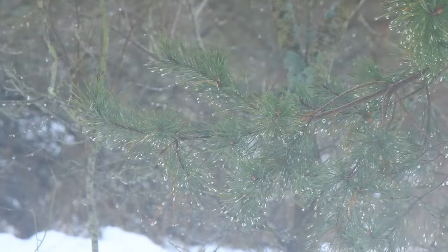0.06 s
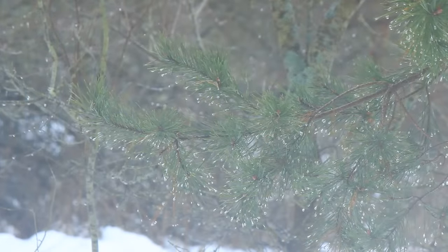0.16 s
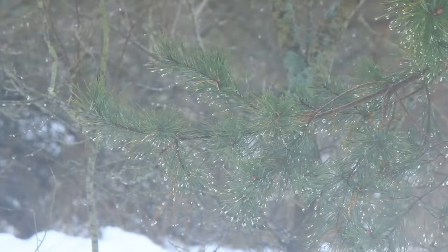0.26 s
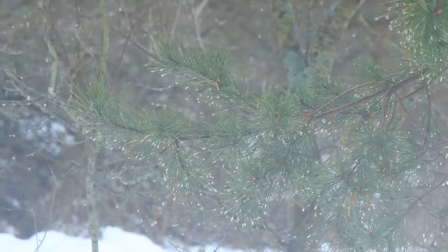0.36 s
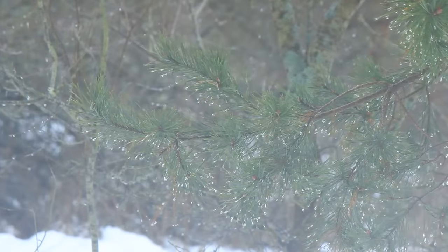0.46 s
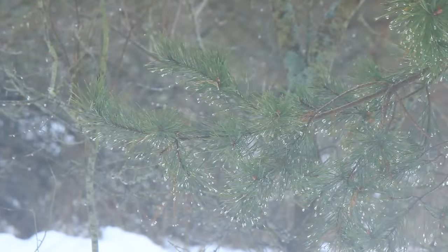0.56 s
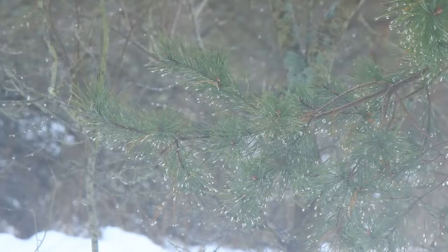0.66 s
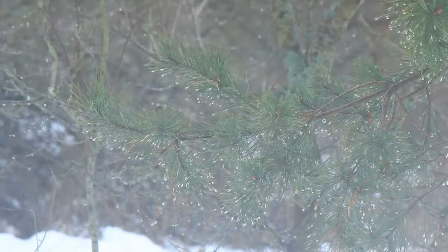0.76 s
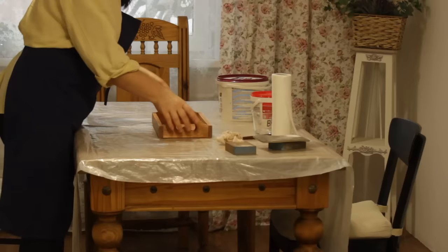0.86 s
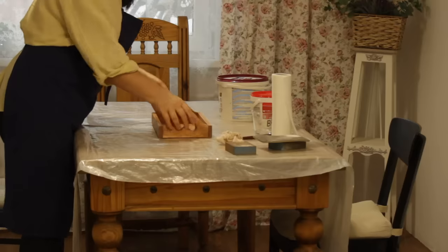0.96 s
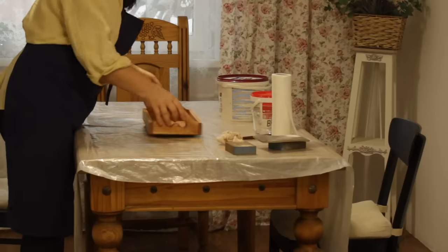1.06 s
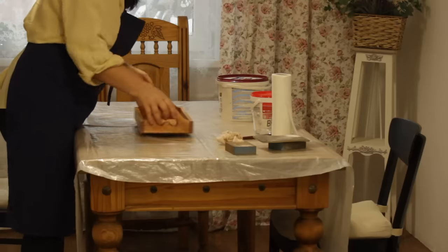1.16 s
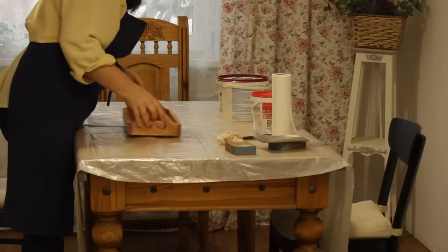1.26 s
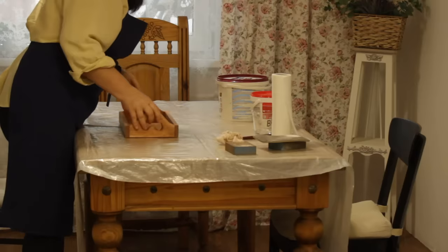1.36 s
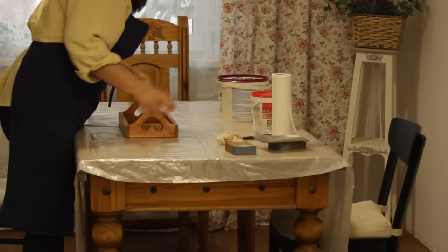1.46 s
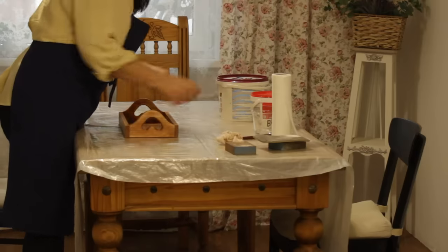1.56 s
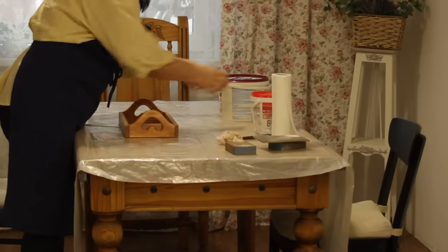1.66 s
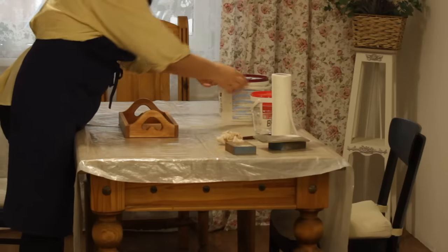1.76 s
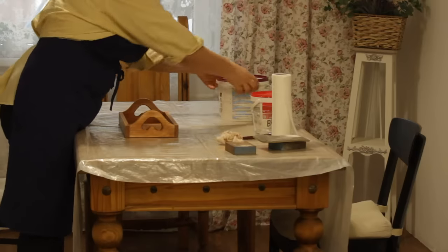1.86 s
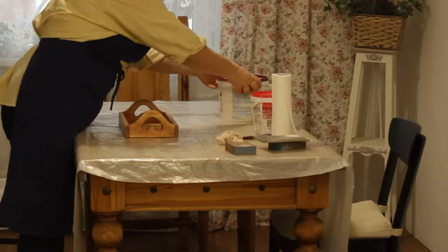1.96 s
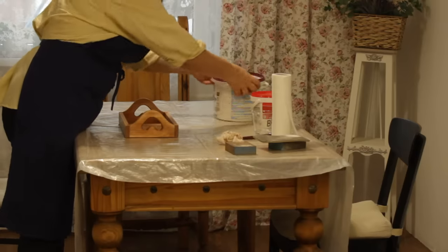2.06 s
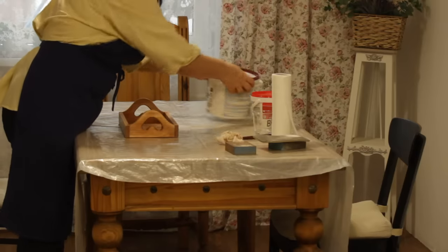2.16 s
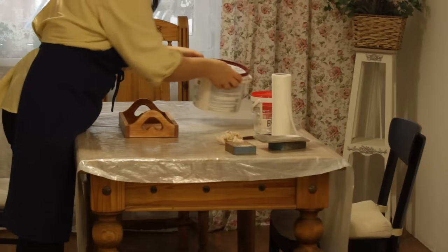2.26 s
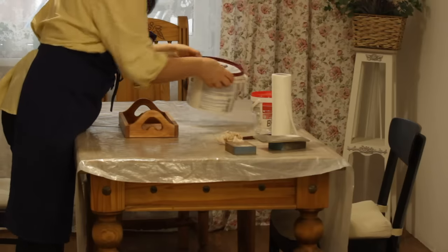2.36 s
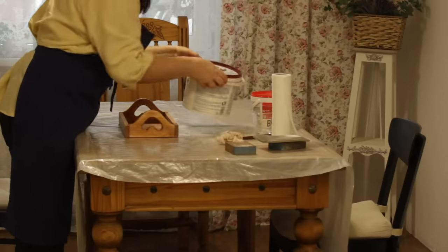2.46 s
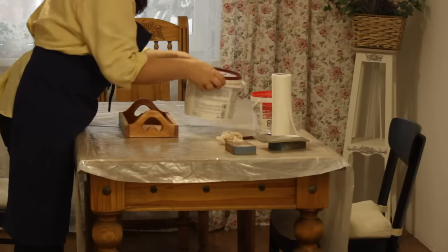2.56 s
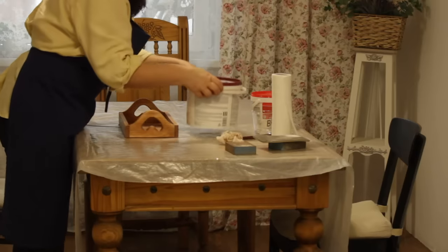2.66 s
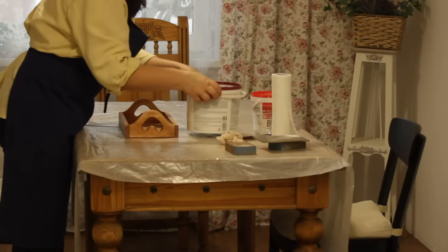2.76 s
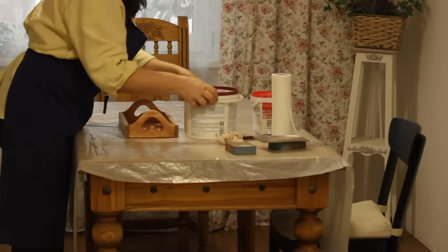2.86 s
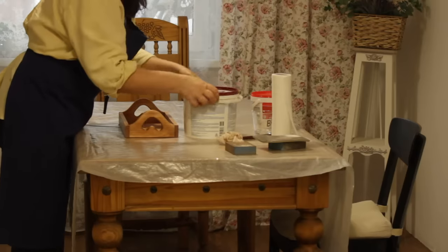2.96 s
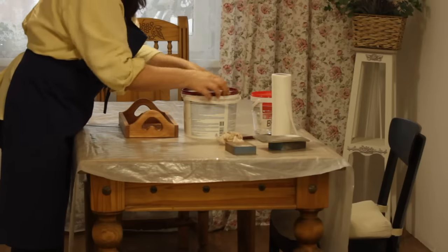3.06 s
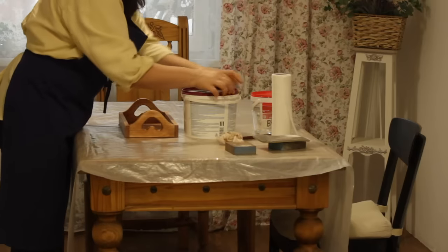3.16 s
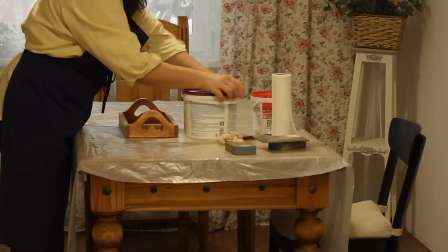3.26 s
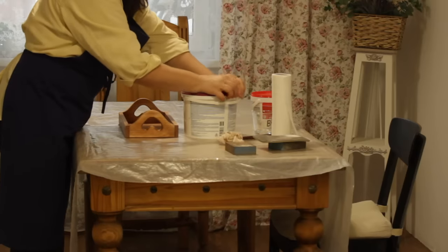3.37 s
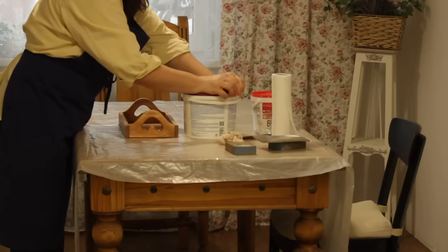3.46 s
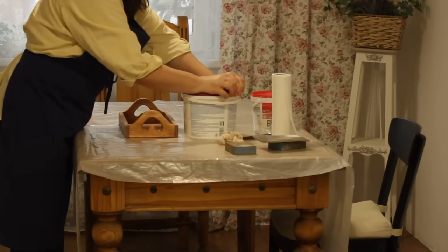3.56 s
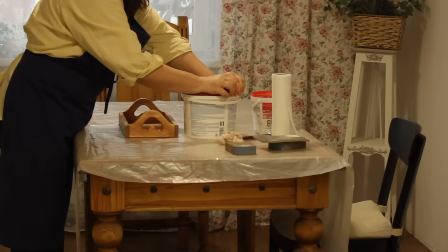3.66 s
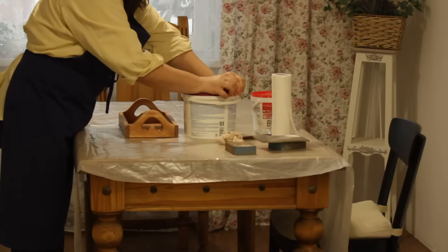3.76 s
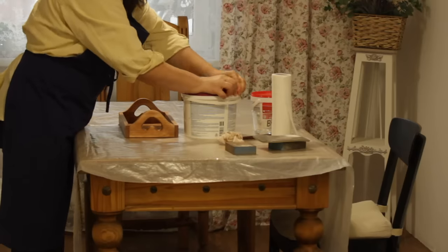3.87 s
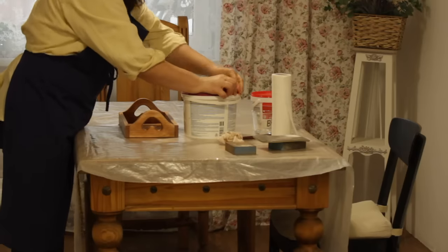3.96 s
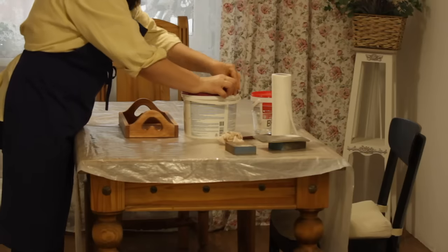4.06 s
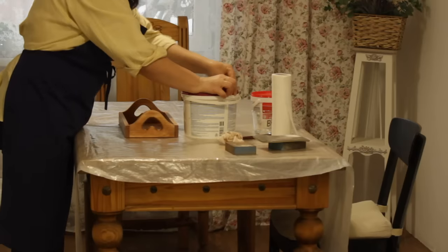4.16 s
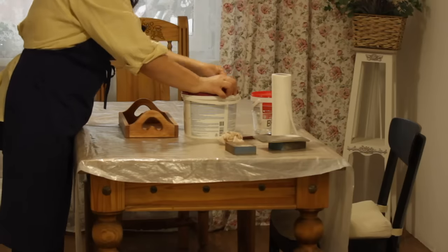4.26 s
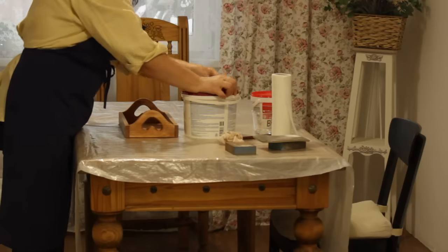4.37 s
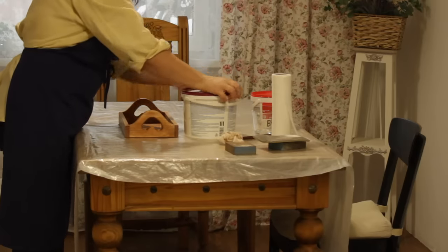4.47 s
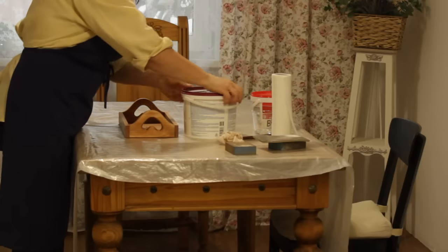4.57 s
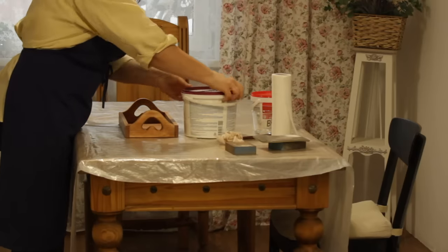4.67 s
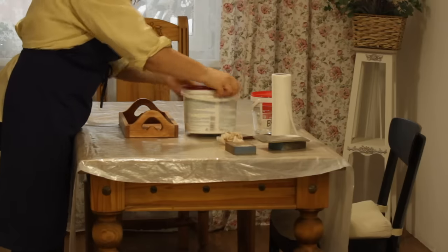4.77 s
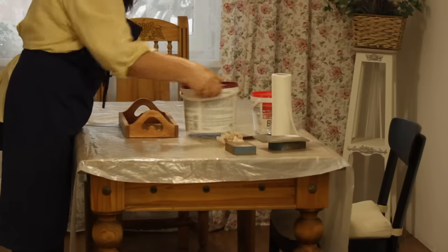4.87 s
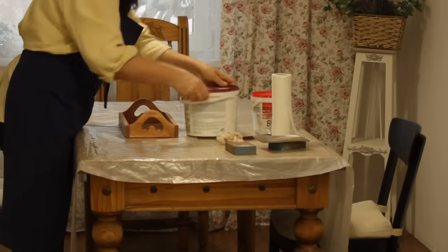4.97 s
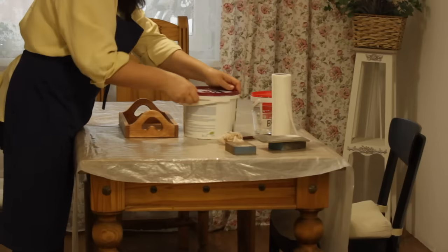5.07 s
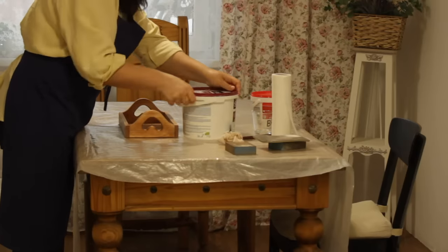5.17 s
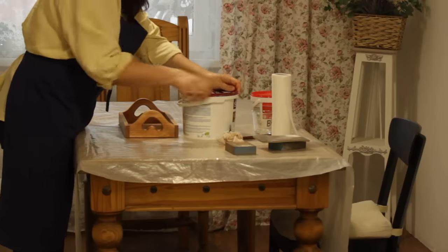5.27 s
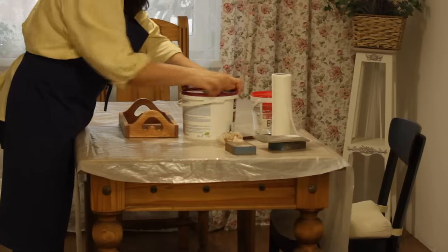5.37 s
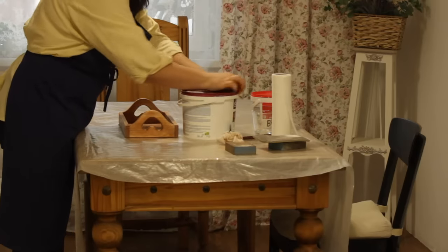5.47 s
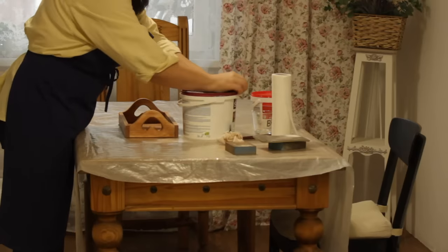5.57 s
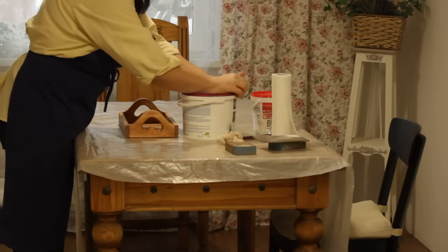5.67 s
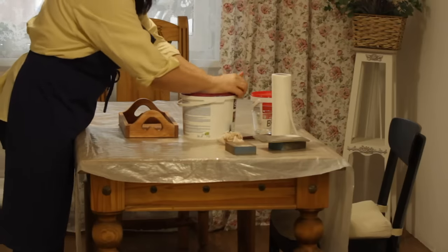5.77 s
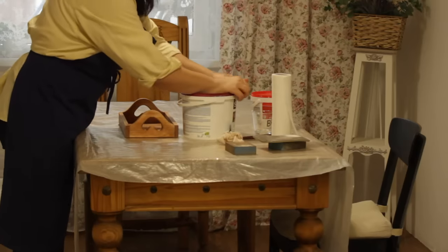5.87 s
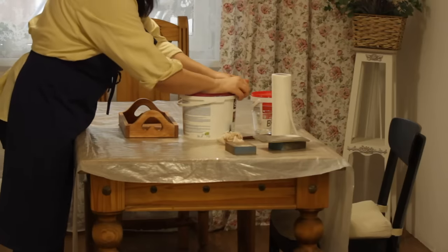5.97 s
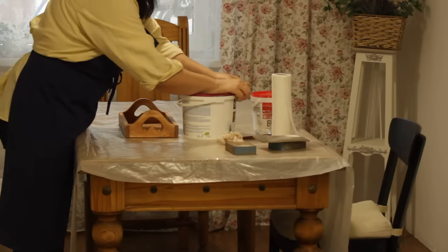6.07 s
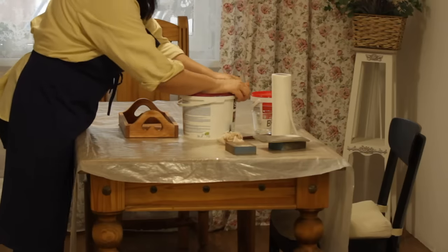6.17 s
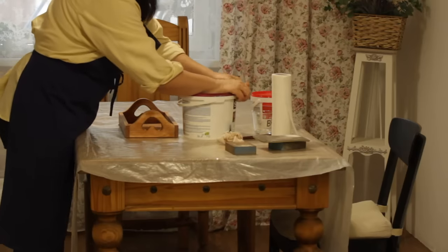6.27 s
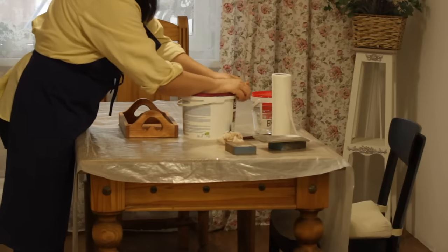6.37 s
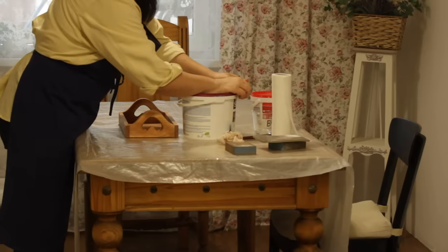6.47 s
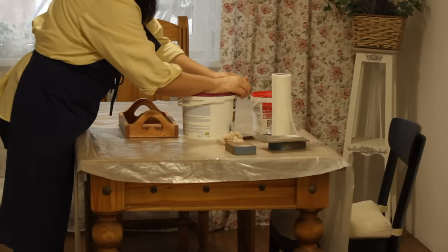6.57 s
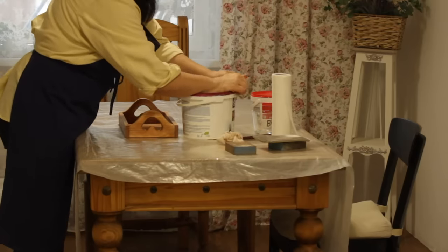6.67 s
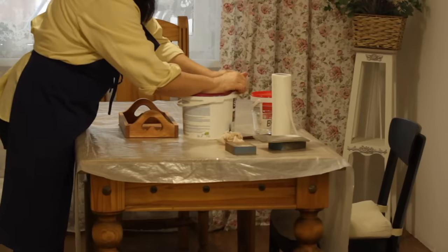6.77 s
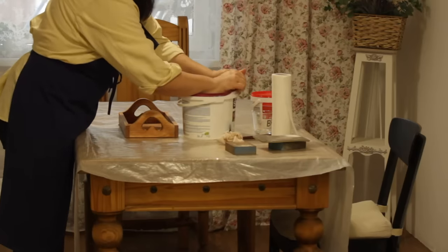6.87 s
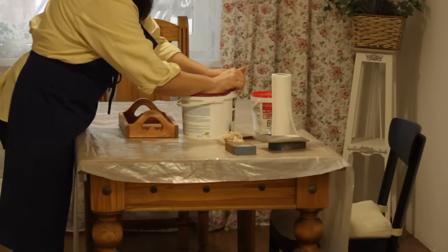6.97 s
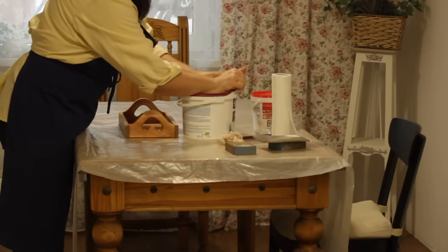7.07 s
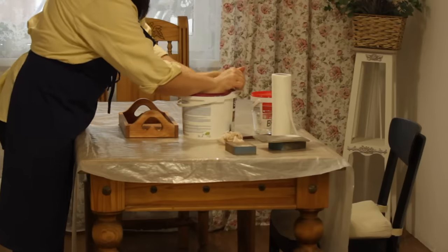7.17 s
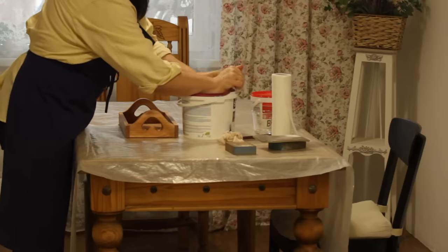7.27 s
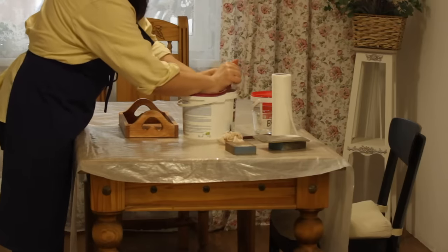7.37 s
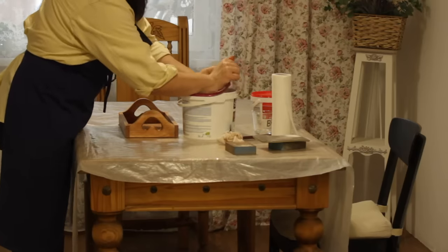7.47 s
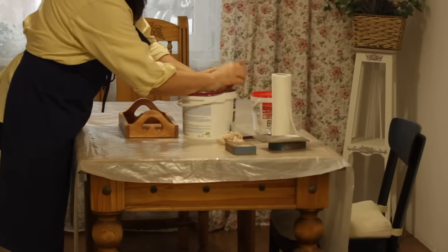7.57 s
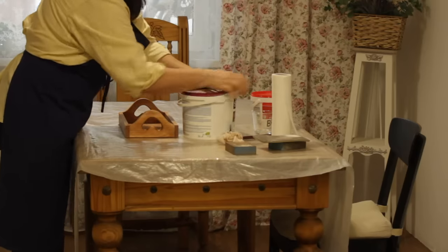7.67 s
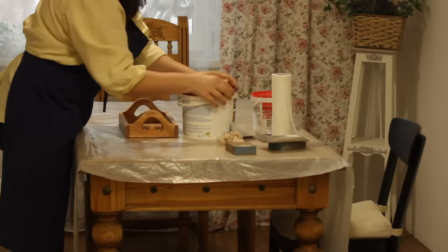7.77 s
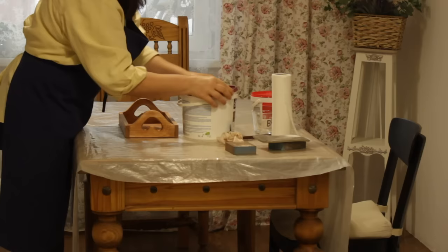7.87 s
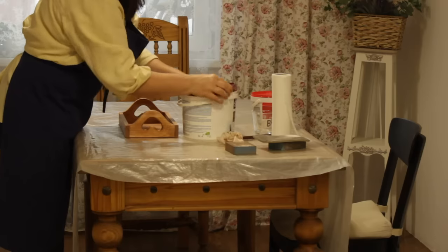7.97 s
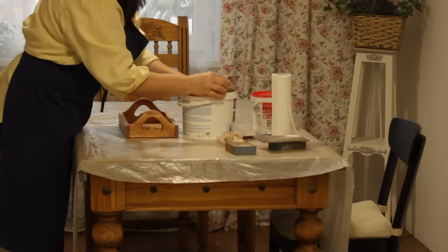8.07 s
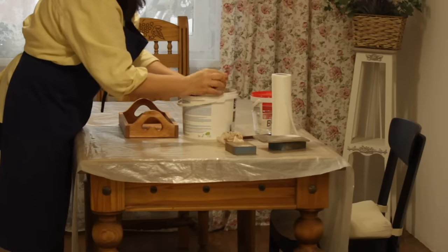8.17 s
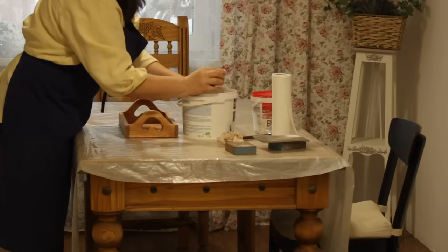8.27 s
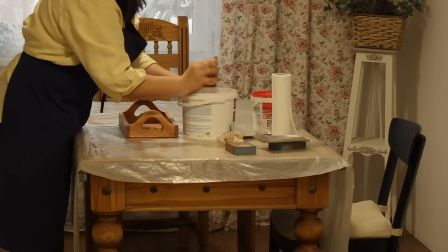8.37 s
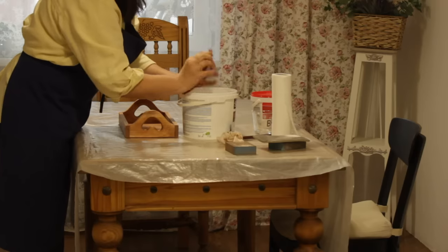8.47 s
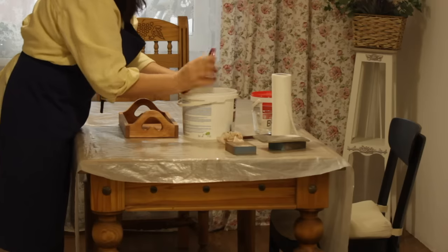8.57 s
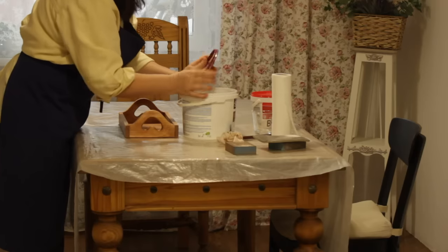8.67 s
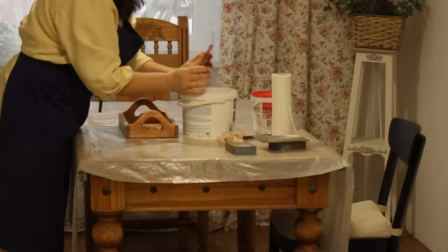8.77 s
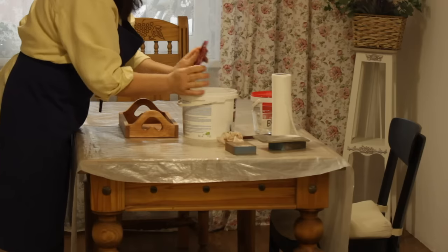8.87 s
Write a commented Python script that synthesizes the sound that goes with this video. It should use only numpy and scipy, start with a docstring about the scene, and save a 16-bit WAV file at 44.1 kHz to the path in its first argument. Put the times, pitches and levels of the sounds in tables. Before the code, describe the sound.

A moment of outdoor drizzle and distant rumble gives way abruptly to a slightly echoing room with soft ventilation and a thin electronic whine, heard in mono. A wooden tray is put down, then a plastic tub lands on the table and is shifted. Fingernails tick on it while the lid cracks and snaps free of the rim bit by bit, gives one loud hollow pop, and scrapes off with a few more pops.

```python
"""A plastic tub is put on a dining table, turned, and its lid pried off with pops, cracks and scrapes.
Each knock makes parts of the tub and table ring, and the room echoes it. Before that a wooden tray is
set down. Ventilation drones and a camera whines faintly. The first second is outdoors, in fine rain
with a far rumble (stereo); then the sound cuts to the dining room (mono)."""
import sys
import numpy as np
from scipy import signal
from scipy.fft import rfft, irfft, next_fast_len
from scipy.io import wavfile
from scipy.ndimage import map_coordinates

SR = 44100
rng = np.random.default_rng(int(sys.argv[2]) if len(sys.argv) > 2 else 0)


def store_wav(level_fs):
    """Save 16-bit WAV to argv[1]."""
    pcm = np.round(np.clip(np.atleast_2d(level_fs), -1, 1) * 32767)
    wavfile.write(sys.argv[1], SR, pcm.T.astype(np.int16))


N = 393372
TIME = np.arange(N) / SR
KNOCK_SAMPLES = 2 ** 15  # length of one knock with its echo
KNOCK_HZ = np.fft.rfftfreq(KNOCK_SAMPLES, 1 / SR)

# how the tub's base, hollow and thin edge ring: (pitch [Hz], width [Hz], level [dB])
TUB_BASE = [(357.5, 90, 0), (394, 85, -5.5), (462, 56, 1)]
TUB_HOLLOW = [(515.5, 64, 4.2), (615.5, 47, -0.9), (726, 127, 1.5)]
TUB_EDGE = [(7500, 5000, 0), (13000, 9000, -9)]


def tub_parts():
    """The six stiff parts, low to high. They ring at the same pitches whatever hits them."""
    # how the table, tub wall and rim ring: (pitch [Hz], width [Hz], level [dB])
    table = [(70, 28, -13), (181, 23, -12.5), (278.5, 90, 11.5)]
    wall = [(890, 115, 6.5), (1074, 126, -8), (1202, 105, 4), (1445, 284, -3.5)]
    rim = [(1750, 380, 9.6), (2120, 380, 6.4), (2930, 1550, 1.8)]
    return [ringing(part) for part in (table, TUB_BASE, TUB_HOLLOW, wall, rim, TUB_EDGE)]


def part_levels(db, hardness):
    """A level for each stiff part: a harder knock favours the high ones."""
    # middle of table, base, hollow, wall, rim and edge: (pitch [Hz])
    middles = [270, 410, 610, 1100, 2000, 8000]
    return db + hardness * np.log2(np.divide(middles, middles[2]))


def tub_landings():
    """The tub lands: its parts, lid and lip ring, and the whole table top thuds."""
    # (time [s], tub [dB], hardness [dB/octave], thud [dB], lid [dB], lid pitch [Hz], lip [dB])
    landings = [(2.935, -22.5, 1.3, -37.5, -24.5, 723, -48), (2.973, -34, 0.3, -47, -26.5, 645, -59),
                (5.069, -25.5, -2.5, -44, -27.5, 377, -65), (5.205, -42.5, -5.5, -54, -46, 278, -47.5)]
    # the table top's thud: (pitch [Hz], width [Hz], level [dB])
    thud = [(60, 38, -8), (166.3, 52, 1)]
    # boost for each stiff part: (level [dB])
    mix = [-2.5, 0.5, 1, -2.5, -9.5, -38]
    out, parts = np.zeros(N), tub_parts()
    for start, db, hardness, thud_db, lid_db, lid_hz, lip_db in landings:
        levels = [*(part_levels(db, hardness) + mix), thud_db, lid_db, lip_db]
        rings = parts + [ringing(thud), lid_note(lid_hz), lip_note(hz=4540)]
        add_knock(out, start, levels, rings, swell_s=0.0048, echo_db=11)
    return out


def lid_pops():
    """The lid flexes and drums, at a different pitch each time it bends."""
    # (time [s], tub [dB], hardness [dB/octave], lid [dB], lid pitch [Hz], overtone [dB],
    #  overtone pitch [Hz], lip [dB], lip pitch [Hz], echo [dB])
    pops = [ (2.106, -48, 2, -58, 576, -45, 2420, -64, 3300, 3.5),
            (4.693, -50, 5, -41, 445, -57, 1110, -56, 3870, 4),
            (6.484, -46.5, 4, -46.5, 269, -51, 401, -54, 5460, 10),
            (6.776, -48.5, 4.5, -43, 300, -53, 453, -45.5, 4900, 6.5),
            (7.382, -23.5, -0.8, -16.5, 593, -20.5, 1120, -39, 3620, 7.5),
            (7.398, -28, 2.5, -20, 357, -29, 1130, -40, 3630, 6),
            (7.828, -50.5, 3.5, -43, 350, -50, 886, -80, 3110, 3.5),
            (8.080, -55, -1, -47, 630, -62, 1080, -64, 4600, 6),
            (8.132, -39, 2.7, -25.5, 395.5, -64, 912, -48, 4000, 10.5),
            (8.421, -41, -2, -28.5, 501, -33, 1406, -56, 3260, 5),
            (8.538, -34.5, 0, -44, 417, -33, 1990, -38.5, 3900, 9),
            (8.575, -33.5, 0.6, -28, 537, -43, 1126, -46, 3520, 0.5),
            (8.851, -39.5, 2.4, -26, 601, -59, 1740, -43, 5830, 6),
            (8.883, -55, -.6, -31.5, 600, -59, 1130, -47, 3350, 15)]
    # boost for each stiff part: (level [dB])
    mix = [-13, 0, -1.5, 0, -5, -26.5]
    out, parts = np.zeros(N), tub_parts()
    for start, db, hardness, lid_db, lid_hz, over_db, over_hz, lip_db, lip_hz, echo_db in pops:
        levels = [*(part_levels(db, hardness) + mix), lid_db, over_db, lip_db]
        rings = parts + [lid_note(lid_hz), overtone(over_hz), lip_note(lip_hz)]
        swell_s = 0.0052 * amp(0.4 * echo_db)  # a louder echo swells for longer
        add_knock(out, start, levels, rings, swell_s, echo_db)
    return out


def lip_cracks():
    """The lid's lip breaks free with a crack that rings the tub's wall."""
    # (time [s], tub [dB], hardness [dB/octave], wall note [dB], wall pitch [Hz], lip [dB],
    #  lip pitch [Hz], edge [dB], echo [dB])
    cracks = [ (1.872, -52, 0, -55, 654, -58, 3350, -60, 5),
              (1.910, -50, 2, -50, 622, -38.5, 4500, -46.5, 12),
              (4.519, -60.5, 6.5, -75, 1210, -54, 4240, -66, 8),
              (4.728, -33, 1.8, -33.5, 1230, -32, 4300, -60, 7),
              (5.438, -48.5, 0, -48.5, 1180, -48, 4200, -71.5, 3),
              (5.641, -38, -0.1, -38.5, 1216, -28.5, 3970, -61, 3),
              (5.966, -43.5, 0.5, -67, 1230, -41, 5530, -47.5, 5),
              (6.966, -35.5, -1.5, -34.5, 976, -44.5, 3370, -56, 8),
              (7.243, -54.5, 4, -74, 1200, -48, 5200, -69, 7)]
    # boost for each stiff part but the edge: (level [dB])
    mix = [-14.5, -12, -6, -5, 0]
    out, parts = np.zeros(N), tub_parts()
    for start, db, hardness, wall_db, wall_hz, lip_db, lip_hz, edge_db, echo_db in cracks:
        levels = [*(part_levels(db, hardness)[:-1] + mix), edge_db, wall_db, lip_db]
        rings = parts + [overtone(wall_hz), lip_note(lip_hz)]
        add_knock(out, start, levels, rings, swell_s=0.0027, echo_db=echo_db)
    return out


def lip_snaps():
    """The lip slips over the rim with a small, bright snap."""
    # (time [s], lip [dB], lip pitch [Hz], edge [dB], echo [dB])
    snaps = [(5.650, -38, 6500, -49, 1), (5.937, -49, 2400, -63, 8), (5.958, -37, 4960, -52, 9),
             (5.976, -46, 5500, -50, -2), (6.388, -53.5, 5700, -69, 6), (6.788, -49, 5800, -57, -2),
             (6.847, -43.5, 4870, -46.5, -3), (6.856, -49, 6170, -52, 0), (6.968, -46.5, 6030, -65, 4),
             (7.357, -43, 4400, -41.5, -3), (7.366, -38, 6100, -51, 9), (8.48, -41, 5460, -51, 6),
             (8.489, -45, 5100, -60, 4), (8.551, -44, 4100, -60, -1), (8.587, -43.5, 4600, -50, 0)]
    out = np.zeros(N)
    for start, lip_db, lip_hz, edge_db, echo_db in snaps:
        rings = [lip_note(lip_hz), ringing(TUB_EDGE)]
        add_knock(out, start, [lip_db, edge_db], rings, swell_s=0.0015, echo_db=echo_db)
    return out


def lid_note(hz):
    """The lid rings briefly, like a small drum."""
    return ringing([(hz, 0.17 * hz, 0)])


def overtone(hz):
    """A further note of the plastic: the higher it is, the faster it dies."""
    return ringing([(hz, 0.13 * hz * (hz / 1000), 0)])


def lip_note(hz):
    """The bent lip: a broad crack with a slightly narrower ring on top."""
    return ringing([(hz, 0.61 * hz, 0)]) + ringing([(hz, 0.44 * hz, -7)])


def rubbing():
    """Grainy friction drums on the tub and scratches on the table cover."""
    # (start [s], full from [s], full until [s], end [s], drum [dB], scratch [dB])
    strokes = [(.86, 0.923, 1.08, 1.07, -76, -60.5), (1.9, 1.925, 1.99, 2.23, -71, -57),
               (4.17, 4.297, 4.33, 4.3, -80, -66), (4.47, 4.554, 4.63, 4.7, -78, -65),
               (4.62, 4.74, 4.72, 5, -66, -54), (5.101, 5.164, 5.25, 5.52, -50.5, -60),
               (7.9, 7.946, 8.1, 8.17, -68, -63.5), (8.25, 8.41, 9.7, 8.5, -48, -55),
               (8.467, 8.56, 8.13, 8.75, -42, -42)]  # times out of order make the level jump
    # tone of the scratch: (pitch [Hz], level [dB])
    scratch_tone = [(530, -32), (900, -5), (1110, -6), (1760, 1.5), (2080, -6.5), (2790, -4), (3290, -4),
                    (15000, -23.5)]
    fade_db = [-25.5, 0, 0, -25.5]
    fades = amp([np.interp(TIME, row[:4], fade_db, left=-200, right=-200) for row in strokes])
    drum_db, scratch_db = np.transpose(strokes)[4:]
    # slow sticking and slipping, plus a fine grain
    grains = rng.standard_normal(N) * amp(1.6 * wobble(45) + 4 * wobble(500))
    drum = unit(filtered(grains, lambda hz: ringing(TUB_BASE + TUB_HOLLOW, hz)))
    scratch = unit(filtered(grains, lambda hz: amp(along(scratch_tone, hz))))
    rubs = drum * (amp(drum_db) @ fades) + scratch * (amp(scratch_db) @ fades)
    return signal.fftconvolve(rubs, room(echo_db=0, swell_s=0.0014))[:N]


def ticks():
    """Fingernails and the slack rim tick: very short notes with little echo."""
    # (time [s], level [dB], pitch [Hz])
    taps = [(2.396, -49, 3540), (2.6467, -45.5, 2270), (3.19, -46, 3500), (3.3639, -51, 2010),
            (3.6013, -47, 3400), (3.693, -52, 1720), (3.7502, -47, 2320), (4.0477, -47, 3500),
            (4.2652, -49, 3520), (4.3142, -46, 2270), (5.5648, -47, 3530), (5.881, -48, 3500),
            (6.2644, -47, 3560), (6.6646, -48, 3530), (7.632, -42.5, 3880), (7.673, -48, 3480),
            (7.9727, -47, 1630), (8.054, -56, 1670)]
    out, t = np.zeros(N + SR), np.arange(SR // 50) / SR
    for start, db, hz in taps:
        tick = amp(db) * np.sin(2 * np.pi * hz * t) * np.exp(-t * hz / 6.8)
        out[round(start * SR):][:len(t)] += tick
    return signal.fftconvolve(out, room(echo_db=-5, swell_s=0.002))[:N]


def tray():
    """The wooden tray lands on one edge, rocks, then lies flat."""
    # how the wood rings: (pitch [Hz], width [Hz], level [dB])
    wood = [(306, 100, -2.5), (427, 89, 6), (654, 220, -1.5), (726.6, 35, 8), (846, 160, 5),
            (1119, 58, 8.5), (1280, 180, -3), (1595, 210, -8.5), (2020, 260, -15.5), (2750, 1300, -35),
            (4150, 1900, -39)]
    # (time [s], level [dB], echo swell [s])
    landings = [(1.384, -19, 0.0064), (1.393, -16.5, 0.0057), (1.42, -31, 0.017)]
    out = np.zeros(N)
    for start, db, swell_s in landings:
        add_knock(out, start, [db], [ringing(wood)], swell_s, echo_db=12.5)
    return out


def add_knock(out, start, levels_db, rings, swell_s, echo_db):
    """Add one knock to out: each part rings at its own relative level, and the room answers."""
    spectra = unit(np.array(rings) * rfft(room(echo_db, swell_s)))
    knock = amp(25) * irfft(amp(levels_db) @ spectra, KNOCK_SAMPLES)
    first = round(start * SR)
    out[first:first + KNOCK_SAMPLES] += knock[:N - first]


def room(echo_db, swell_s):
    """The room's answer to a click: the direct sound, then an echo that swells and dies away."""
    # (pitch [Hz], time to fade by 60 dB [s])
    fade_times = [(60, 0.75), (200, 0.31), (600, 0.41), (1500, 0.43), (4000, 0.46), (12000, 0.21)]
    hz, t, noise = signal.stft(rng.standard_normal(KNOCK_SAMPLES), SR, nperseg=256)
    fade = amp(-60 * t / along(fade_times, hz)[:, None])
    echo = signal.istft(noise * fade, SR, nperseg=256)[1][:KNOCK_SAMPLES]
    echo *= 1 - np.exp(-np.arange(KNOCK_SAMPLES) / SR / swell_s)
    echo *= amp(echo_db) / np.linalg.norm(echo)
    echo[rng.integers(8, 120, size=3)] += rng.uniform(-.55, .55, size=3)  # bounces off table and tub
    echo[0] = .85  # direct sound
    return echo


def room_background():
    """Throbbing ventilation, a steady hiss of air and the thin whine of camera electronics."""
    # how the ventilation rings: (pitch [Hz], width [Hz], level [dB])
    vents = [(364, 45, -11), (518.4, 91, 2), (576.3, 20, 5.5), (628.5, 45, 5.5), (1238, 190, -8)]
    # tone of the hiss: (pitch [Hz], level [dB])
    air_tone = [(12, -50), (20, -8), (27, -18.5), (162, -14), (292, -4.5), (317, -6), (355, 1.5), (456, -6),
                (524, -11), (797, -5), (969, -8), (3500, -9), (3800, -11), (12000, -20), (15800, -16.5)]
    # electronic tones: (pitch [Hz], level [dB])
    tones = [(4540, -77.5), (3110, -80), (4780, -81.5)]
    whistle = (15719, -68.5)  # one more, very high
    drone = unit(filtered(rng.standard_normal(N), lambda hz: ringing(vents, hz)))
    drone *= amp(-62 + 1.2 * wobble(8.9))
    whine = sum(np.sqrt(2) * amp(db) * np.sin(2 * np.pi * hz * TIME) for hz, db in [*tones, whistle])
    return amp(-57.8) * hiss(air_tone)[0] + drone + whine


def rain_and_rumble():
    """Fine rain hisses differently left and right; a far rumble is the same on both sides."""
    # tone of each noise: (pitch [Hz], level [dB])
    rain_tone = [(12, -35), (20, -2), (181, -3), (482, -4), (554, -4), (13400, -6), (15800, -7.5)]
    rumble_tone = [(12, -38), (20, -2), (47, -5.5), (205, -0.5), (373, -3), (532, -0.5), (947, -6),
                   (1480, -16), (1760, -22.5), (4000, -23.5), (5200, -29), (8800, -120)]
    rumble = amp(-48.5 + 0.45 * wobble(15)) * hiss(rumble_tone)
    return rumble + amp(-53) * hiss(rain_tone, channels=2)


def ringing(notes, hz=KNOCK_HZ):
    """A filter that rings at the given notes; wider notes die sooner. Squaring steepens each peak."""
    return sum((-1) ** k * amp(db) * (1j * hz * width / (pitch ** 2 - hz ** 2 + 1j * hz * width)) ** 2
               for k, (pitch, width, db) in enumerate(notes))


def hiss(tone, channels=1):
    """Noise with the given tone and an average power of 1."""
    return unit(filtered(rng.standard_normal((channels, N)), lambda hz: amp(along(tone, hz))))


def filtered(x, response):
    """Scale each frequency in x by response(hz)."""
    size = next_fast_len(N + SR)
    return irfft(rfft(x, size) * response(np.fft.rfftfreq(size, 1 / SR)), size)[..., :N]


def wobble(rate):
    """A smooth curve through rate random values a second."""
    return map_coordinates(rng.standard_normal(int(N * rate / SR) + 4), [TIME * rate])


def along(points, hz):
    """Read between (pitch, value) points, with octaves evenly spaced."""
    pitches, values = np.transpose(points)
    return np.interp(np.log(hz + 1), np.log(pitches + 1), values)


def unit(x):
    """Scale each row to an average power of 1."""
    return x / np.sqrt(np.mean(np.abs(x) ** 2, axis=-1, keepdims=True) + 1e-30)


def amp(db):
    """Turn decibels into a multiplier."""
    return 10 ** (np.asarray(db) / 20)


def scene():
    """A moment of rain, then a quick cut to the dining room."""
    cut_s = [.905, .907, .94]
    outside = np.interp(TIME, cut_s, [1, .35, 0]) * rain_and_rumble()
    handling = tray() + tub_landings() + lid_pops() + lip_cracks() + lip_snaps() + ticks() + rubbing()
    handling = filtered(handling, lambda hz: (1j * hz / (45 + 1j * hz)) ** 2)  # less bass below 45 Hz
    inside = np.interp(TIME, cut_s, [0, .9, 1]) * (handling + room_background())
    return outside + inside


def record(dry):
    """Add a tiny constant offset and remove the very highest treble."""
    return filtered(dry + .0007, lambda hz: hz < 15790)


dry = scene()
out = record(dry)
store_wav(out)
```